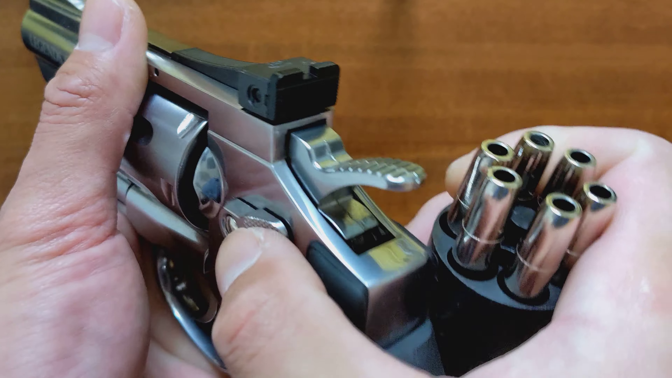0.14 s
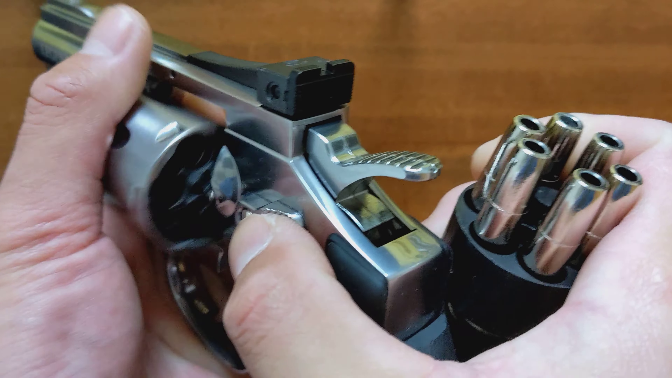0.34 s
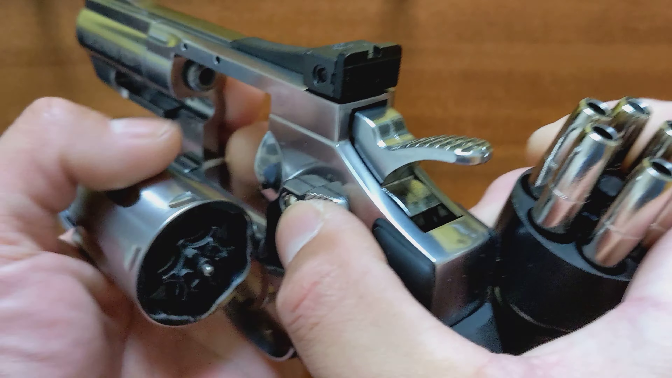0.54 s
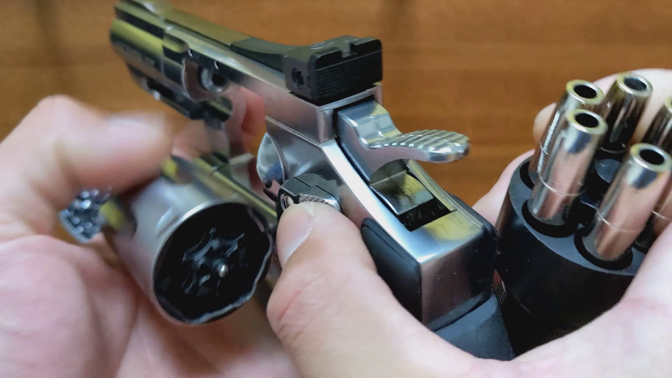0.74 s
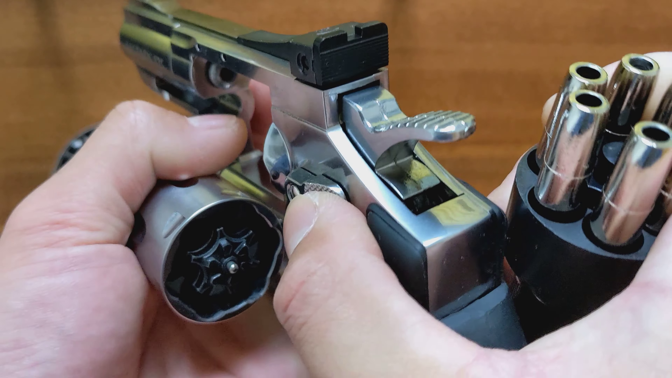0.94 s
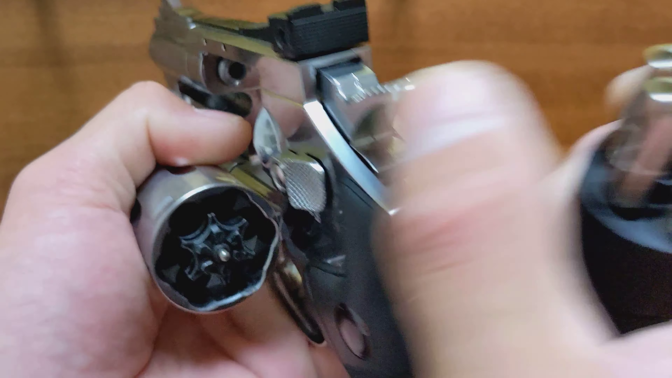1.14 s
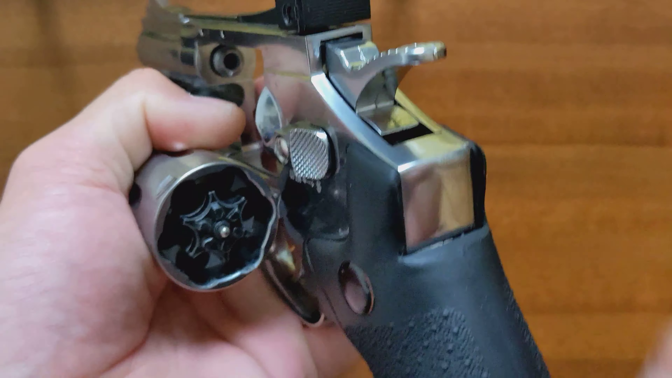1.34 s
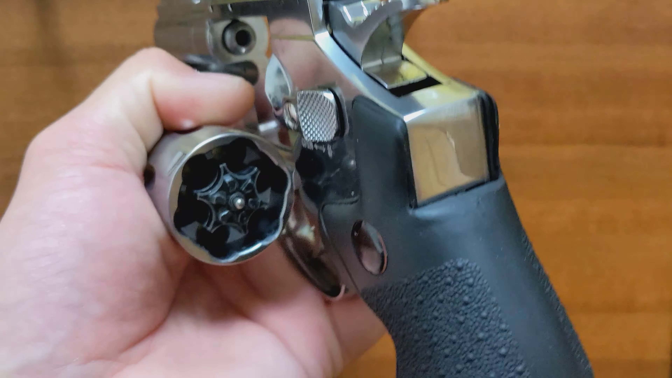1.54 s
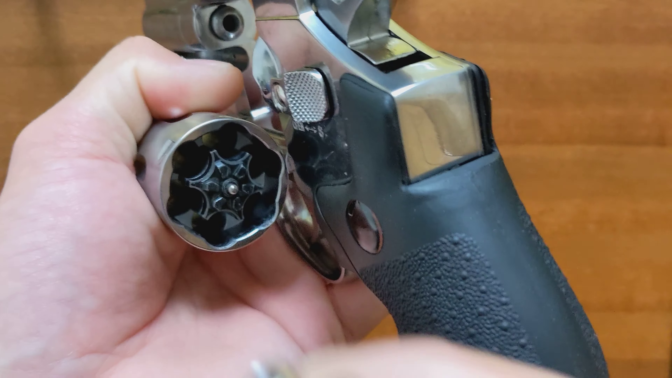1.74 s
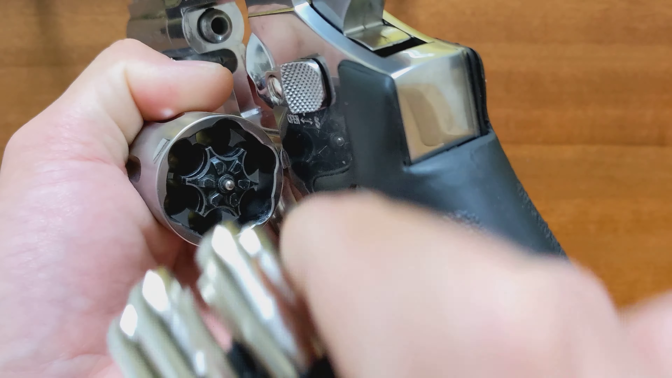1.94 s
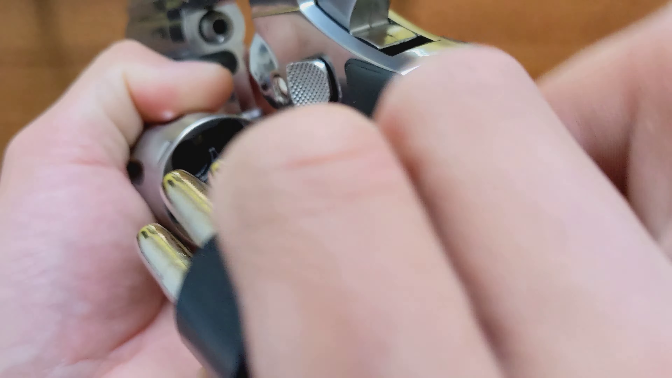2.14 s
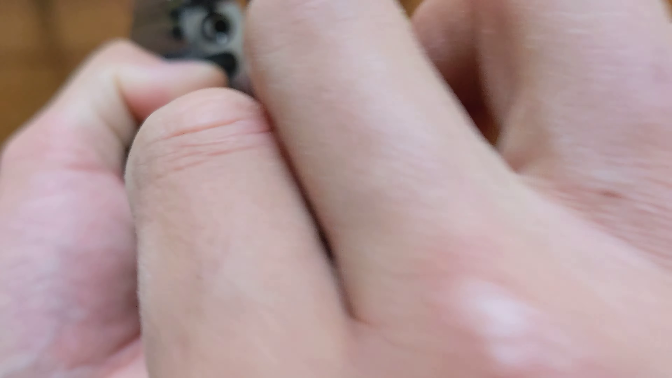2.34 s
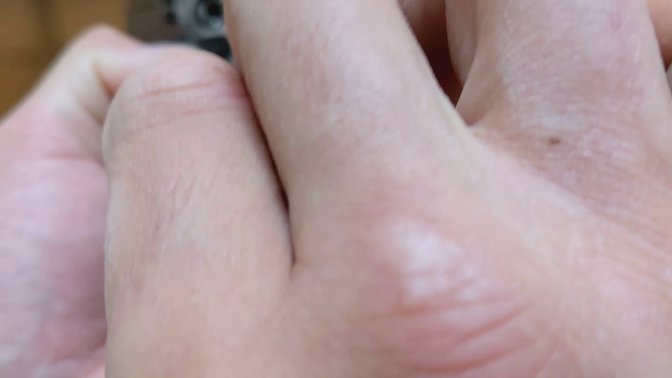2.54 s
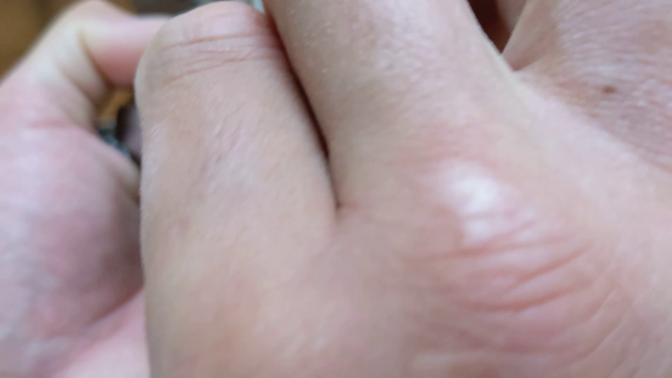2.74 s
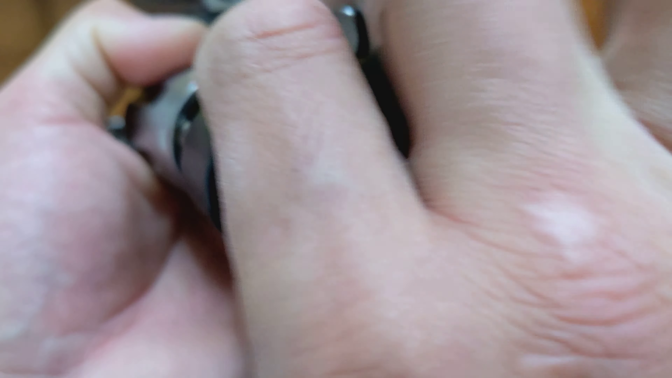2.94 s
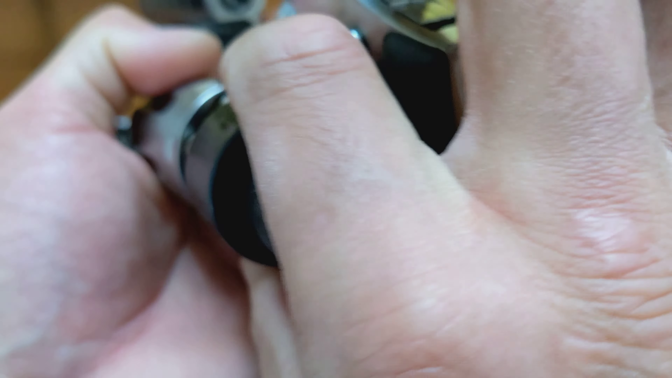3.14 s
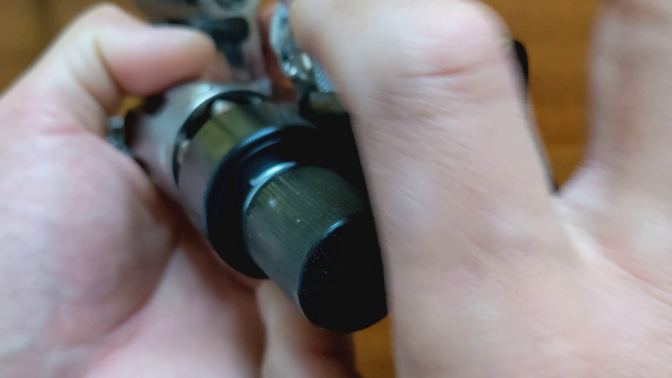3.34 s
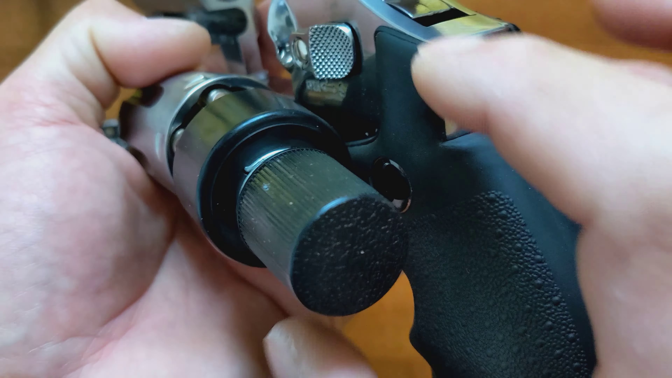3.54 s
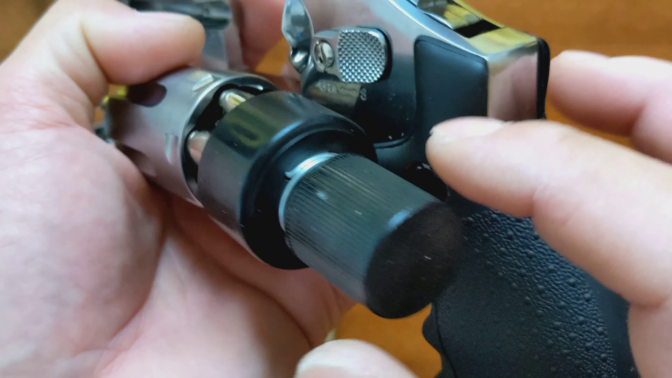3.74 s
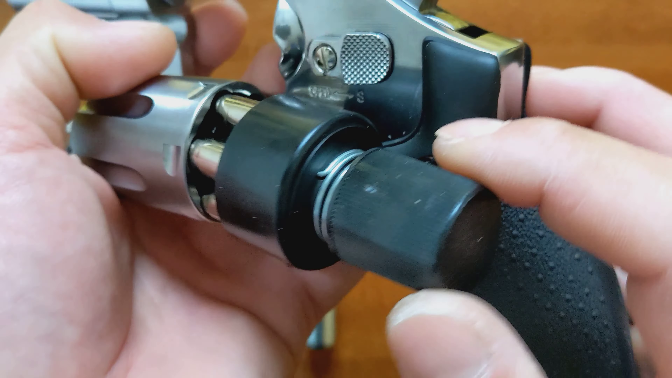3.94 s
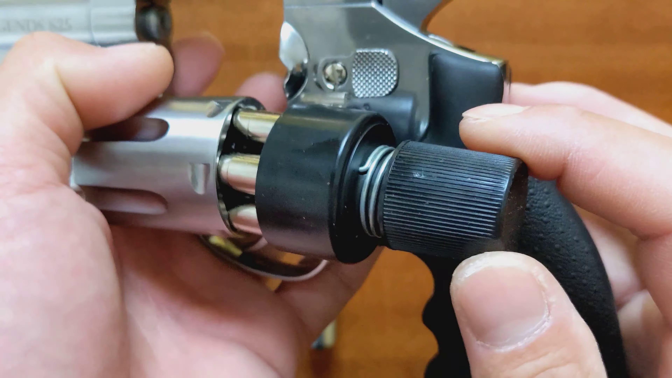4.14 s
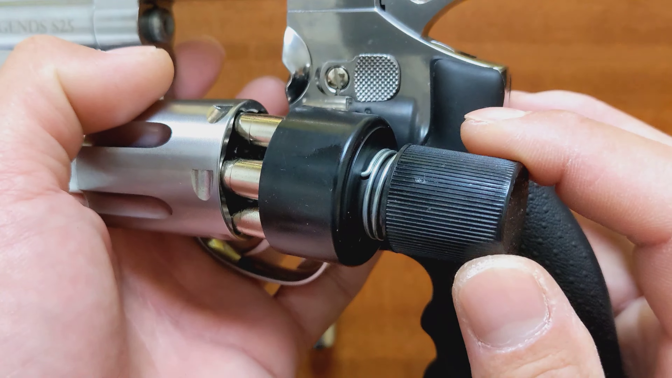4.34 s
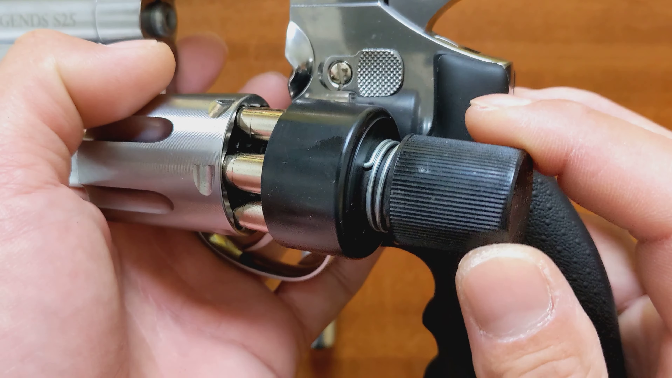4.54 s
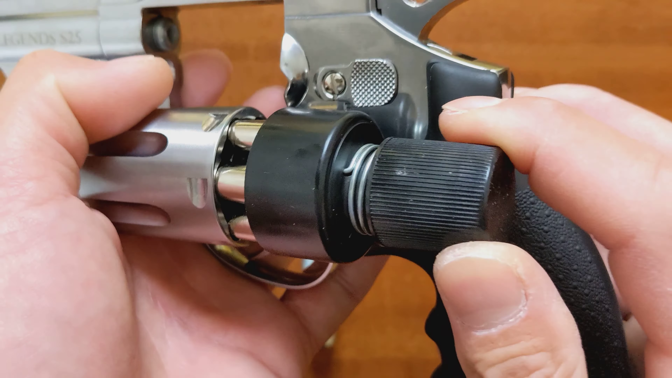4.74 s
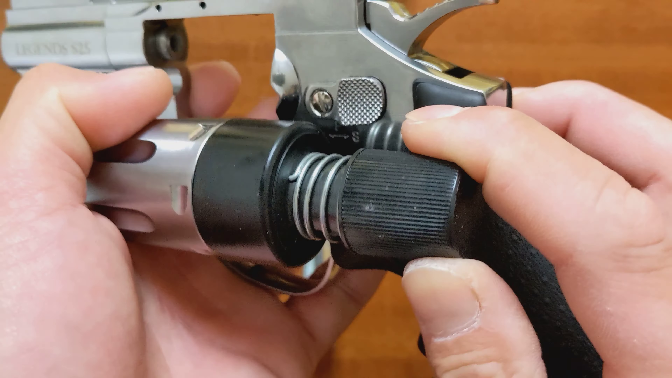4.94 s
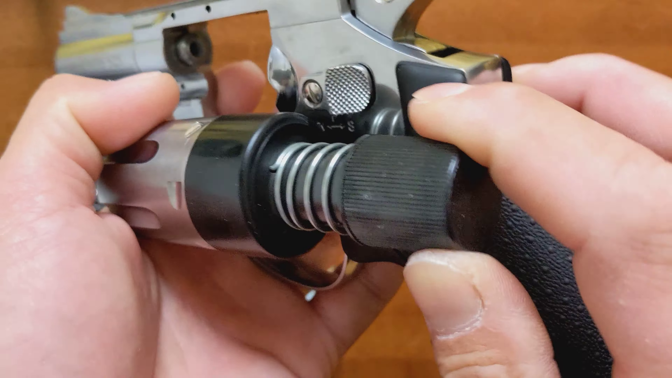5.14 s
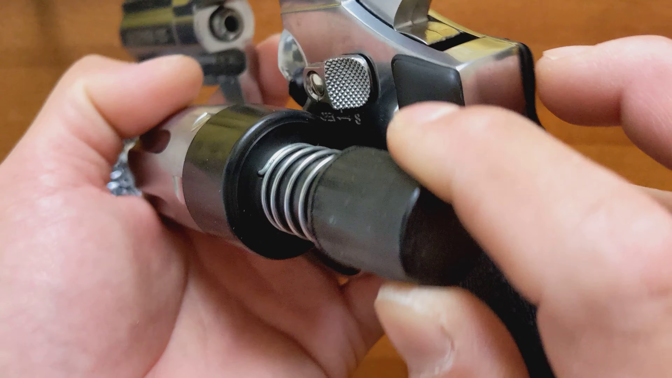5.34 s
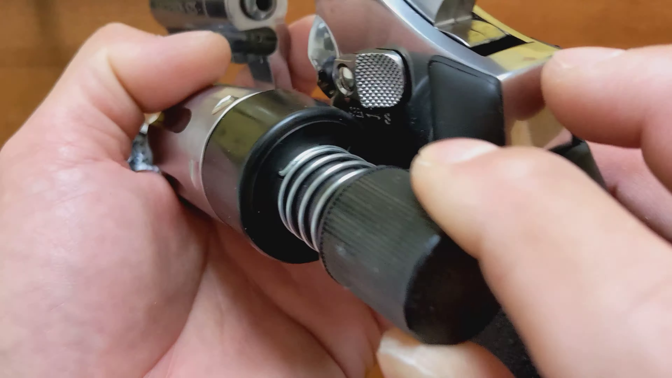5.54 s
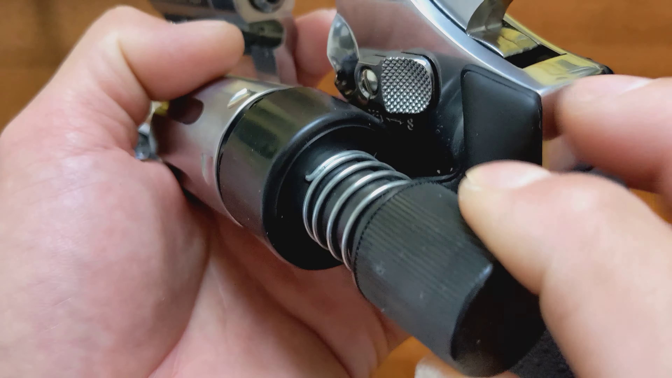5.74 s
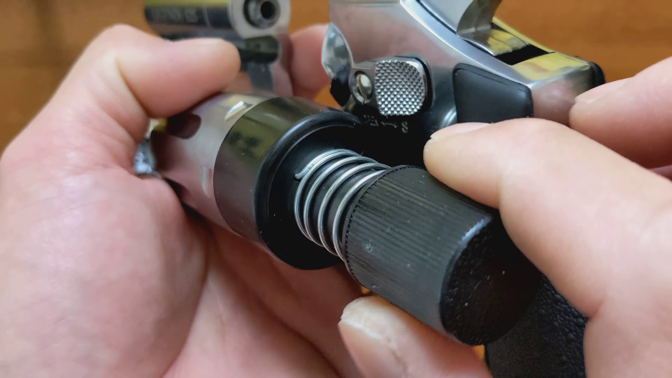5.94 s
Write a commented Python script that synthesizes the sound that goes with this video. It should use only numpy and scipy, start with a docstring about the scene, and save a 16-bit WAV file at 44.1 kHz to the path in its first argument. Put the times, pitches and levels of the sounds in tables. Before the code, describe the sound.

A revolver clicks open, cartridges clink and scrape into the chambers, and a spring loader releases with a sharp double snap.

```python
"""A small room, a wooden table, the microphone close to a revolver being loaded by hand.
The latch is pushed and the cylinder swings out; cartridges rattle in a speedloader, scrape into the
chambers, and the loader's spring snaps them home. Each blow is a burst of rough contact that sounds
hand-damped steel or brass and leaves a few modes ringing. Skin rubs on steel, the near walls answer
briefly, and low ventilation noise and a hum lie underneath."""
import sys
import numpy as np
from scipy import signal
from scipy.fft import rfft, irfft
from scipy.io import wavfile
from scipy.ndimage import uniform_filter1d

SR = 44100
rng = np.random.default_rng(int(sys.argv[2]) if len(sys.argv) > 2 else 0)


def transcribe(u):
    """Save the signal u as a 16-bit wav file named by the first command-line argument.

    u: samples, shape (n,) or (channels, n), limited to [-1, 1]; the rate is SR.
    q: integer samples, one column per channel.
    """
    v = np.clip(np.atleast_2d(u).T, -1, 1)
    q = np.round(v * 32767).astype(np.int16)
    wavfile.write(sys.argv[1], SR, q)


N = 264600
CUTOFF_HZ = 16100
LEAD_S = .006   # the faces graze this long before a blow

# borders between the knock, clack, click and edge of a blow: (frequency [Hz])
REGISTER_BORDERS = [1600, 4000, 9000]
# hand-damped resonances of the cartridges: (frequency [Hz], width [Hz], level [dB])
CARTRIDGE_BODY = [(866, 65, 1), (1043, 58, 3), (1316, 170, -4.5), (1930, 180, -4), (2340, 130, 5),
                  (2690, 350, 1.5), (3070, 400, 2), (5230, 840, -5), (6886, 820, -3), (12300, 1200, -15),
                  (15600, 1300, -13.5)]
# brass dragging over steel: (time [s], length [s], level [dB])
BRASS_SCRAPES = [(0.4, 0.099, -56), (1.559, 0.055, -65), (2.117, 0.082, -63.5), (2.735, 0.087, -50),
                 (2.903, .053, -56.5), (2.965, .12, -52.5), (3.267, 0.019, -66.5), (3.353, 0.02, -64.5),
                 (4.719, 0.03, -66.5), (5.831, 0.081, -51.5)]


def revolver(level_db=-1.26):
    """Close up, a little to the right: the latch is pushed, the cylinder swings out and meets its stop."""
    # hand-damped resonances of the gun: (frequency [Hz], width [Hz], level [dB])
    body = [(851.5, 72, -3), (1043, 68, 0), (1277, 160, -8.5), (1965, 73, -2), (2185, 220, 0),
            (3200, 2200, -4.5), (5500, 1000, 1.5), (7020, 840, 5), (9620, 2600, -1.5), (13500, 2200, 0)]
    # steel ringing on: (frequency [Hz], level [dB], t60 [s])
    modes = [(1055, -20, .14), (2024, -15, .095), (2363, -18, .1), (7052, -6, .085), (12550, 0, .12),
             (14460, -16, .09)]
    # latch, crane and cylinder: (time [s], strength [dB], heft [dB], hardness [dB], slide [ms], ring [dB])
    blows = [(0.303, -48, 4, 1, 1.17, -12.5), (0.3076, -47.5, 4.5, -5, 2.03, -15.5),
             (0.364, -29, -4, 1.5, 0.38, -6), (0.3719, -28.5, -2, 2.5, 0.67, -6),
             (0.389, -40, -6.5, 2.5, 1.02, -22.5), (0.4315, -52.5, 15.5, -2.5, 1.1, -13),
             (0.4549, -36.5, 7, 15.5, .12, -21), (0.5765, -40.5, -1, 0, 0.8, -2.5),
             (0.6788, -34, -5, -9, 0.61, -4), (0.6844, -44, -5, 0, .9, -9),
             (0.8586, -48, 1.5, -12.5, 0.17, -19), (0.9446, -36.5, 6, -3.5, 1.04, -1.5),
             (0.9537, -29, -2, -2, 0.62, 4), (0.9609, -34, -8, -4, 0.89, 1),
             (1.1688, -40, -1, -5.5, 1.23, -15)]
    out, bands = np.zeros((2, N)), registers(low_edge_hz=740)
    for s, db, heft_db, hardness_db, slide_ms, ring_db in blows:
        blow = contact(body, modes, db, heft_db, hardness_db, clack_hz=1980, slide_ms=slide_ms,
                       ring_db=ring_db, pan_db=-3, bands=bands, focus_db=-5.0, edge_db=0, edge_gain=1.61)
        add(out, s - LEAD_S - slide_ms / 1000, blow)
    return from_db(level_db) * out


def cartridges(level_db=-2.0, free_ring_db=-6, held_ring_db=-14, press_damping=0.78, dangling_s=(2.45, 3.1)):
    """Cartridges rattle in the loader, knock at the chamber mouths and settle inside."""
    # brass ringing on: (frequency [Hz], level [dB], t60 [s])
    modes = [(2420, -18.5, .08), (5330, -12.5, 0.083), (12570, -14, .1), (12500, -8, .09),
             (15550, -11.5, .089)]
    # brass on loader and chambers: (time [s], strength [dB], heft [dB], hardness [dB], clack pitch [Hz])
    blows = [(1.2209, -47.5, -13, -18, 2340), (1.4847, -48, -27, -17, 2380), (1.549, -44.5, -18, -11, 2260),
             (1.5762, -38, -18, -9.5, 2570), (1.5882, -46, -5, -4, 2300), (1.6121, -25.5, -24, -20, 2360),
             (1.6156, -45.5, -17, 7, 2410), (2.0767, -53.5, 8, 10, 2230), (2.1162, -43.5, -1.5, -2, 2760),
             (2.4254, -60, 3.5, 2, 3030), (2.5023, -29.5, -9, -5, 2430), (2.7415, -40, -3, -3, 2700),
             (2.754, -44, -5, 3, 2500), (2.7633, -36.5, 8, 3.5, 2010), (2.7697, -31.5, 4.5, -6, 2770),
             (2.9231, -27.5, -6, -6, 2500), (2.9858, -42, -5, -1.5, 2020),
             (3.01, -22.5, -15.5, -15.5, 2900), (3.0331, -35.5, -5.5, 5.5, 2420),
             (3.4428, -33, -9.5, -8.5, 2360), (4.7511, -48, -1.5, -2, 3000), (4.858, -56, 6, -13.5, 2320),
             (5.1879, -28, -23, -12, 3400), (5.2081, -45.5, -10, -2, 2620), (5.2318, -45, -1.5, -2, 2120),
             (5.5758, -38.5, -4.5, 1.5, 3320), (5.5856, -39.5, -6, -2.5, 2265), (5.6231, -48, -2, -3, 2240),
             (5.8788, -29, -12, -11, 2845), (5.8893, -30, -4, 5, 3050), (5.9389, -34.5, -2, 1.5, 2140),
             (5.948, -42, -6, 4.5, 3120), (5.9704, -34, -3.5, -4, 2700)]
    # the loader comes in from the right, over the cylinder: (time [s], left minus right [dB])
    place = [(1.6, -11), (2.1, -3.5), (2.5, -0.5), (3.05, -1), (3.5, -1.5), (6, -4.5)]
    out, bands = np.zeros((2, N)), registers(low_edge_hz=600)
    for s, db, heft_db, hardness_db, clack_hz in blows + catches():
        slide_ms = from_db(-.15 * hardness_db)   # soft touches last longer
        # dangling cartridges ring, the less the more heavily they are pressed
        dangling = dangling_s[0] < s < dangling_s[1]
        ring_db = free_ring_db - press_damping * heft_db if dangling else held_ring_db
        pan_db = np.interp(s, *np.transpose(place))
        blow = contact(CARTRIDGE_BODY, modes, db, heft_db, hardness_db, clack_hz, slide_ms, ring_db,
                       pan_db, bands, focus_db=5.5, edge_db=-3, edge_gain=1.17)
        add(out, s - LEAD_S - slide_ms / 1000, blow)
    return from_db(level_db) * out


def speedloader(level_db=1.0, slide_ms=.75):
    """The loader trips and its spring drives the cartridges in: a dry double snap."""
    # hand-damped resonances of the loader: (frequency [Hz], width [Hz], level [dB])
    body = [(580, 61, -18.5), (860, 86, 4.5), (1040, 160, 0), (1320, 170, -2), (1980, 78, 6.5),
            (2300, 210, 4), (3180, 430, 1.5), (5910, 910, -8), (7240, 910, -2.5), (9500, 7400, -9.5),
            (14200, 1200, 1.5)]
    # the loader ringing on: (frequency [Hz], level [dB], t60 [s])
    modes = [(2010, -20.5, .05), (1950, -18.5, 0.055), (2440, -18, .09), (7100, -5.5, 0.058),
             (14000, -13.5, 0.069), (14900, -6, .06)]
    # release and spring: (time [s], strength [dB], heft [dB], hardness [dB])
    blows = [(4.9417, -27, -12.5, -12.5), (4.9456, -18.5, -6, 1), (4.9643, -39, -7, 7),
             (4.9718, -29.5, -16.5, -9), (5.008, -30.5, -10.5, 2.5), (5.015, -11, -25, -8),
             (5.0284, -23.5, -5, 5)]
    out, bands = np.zeros((2, N)), registers(low_edge_hz=640)
    for s, db, heft_db, hardness_db in blows:
        blow = contact(body, modes, db, heft_db, hardness_db, clack_hz=2130, slide_ms=slide_ms,
                       ring_db=-14, pan_db=-1.7, bands=bands, focus_db=-3.5, edge_db=-1, edge_gain=1.7)
        add(out, s - LEAD_S - slide_ms / 1000, blow)
    return from_db(level_db) * out


def contact(body, modes, strength_db, heft_db, hardness_db, clack_hz, slide_ms, ring_db,
            pan_db, bands, focus_db, edge_db, edge_gain, hand_damping_db=-4.5):
    """A graze, the blow and one rebound sound the damped body and leave its steel or brass ringing."""
    push = from_db(-15.5) * force(slide_ms=4.2)   # the graze
    add(push, LEAD_S, force(slide_ms))
    rebound_s = 0.0054 * rng.uniform(.6, 1.4)
    add(push, LEAD_S + rebound_s, from_db(-18.5) * force(slide_ms))
    damped = damped_body(push, body)
    # the struck part colours the clack with its own pitch
    damped = damped + from_db(focus_db) * resonate(damped, clack_hz, width_hz=380)
    # knock, clack, click and edge, as rms over 5 ms: heft feeds the lowest, hardness the upper two
    levels_db = strength_db + np.array([heft_db, 0, hardness_db, edge_gain * hardness_db + edge_db])
    out = np.zeros((2, 8192))
    for band, db in zip(bands, levels_db):
        add(out, 0, from_db(db) * unit_energy(signal.sosfilt(band, damped)) * np.sqrt(.005 * SR))
    # each mode is driven by its own register; the hand holds down those below the click
    for hz, db, t60 in modes:
        held_db = hand_damping_db * (hz < REGISTER_BORDERS[1])
        drive_db = levels_db[np.searchsorted(REGISTER_BORDERS, hz)] + ring_db + held_db
        add(out, LEAD_S + slide_ms / 1000, from_db(drive_db + db) * ringing(hz, t60))
    return out * rms_one(balance(pan_db))


def force(slide_ms, chatter_db=-16, chatter_s=0.013, grit_db=5.0, apart_hz=2800):
    """Rough faces meet, slide and chatter to rest; left and right differ mainly in the treble."""
    t = np.arange(2048) / SR
    progress = t * 1000 / (1.7 * max(slide_ms, .05))   # 1 at the peak of the pressure
    press = (progress * np.exp(1 - progress)) ** 2
    chatter = from_db(chatter_db) * (1 - np.exp(-progress ** 2)) * np.exp(-t / chatter_s) * np.sqrt(slide_ms)
    grit = from_db(grit_db * np.repeat(rng.standard_normal(len(t) // 16), 16))
    mid, side = (press + chatter) * grit * rng.standard_normal((2, len(t)))
    return unit_energy(mid + cut(side, apart_hz, "high", order=1) * np.array([[1], [-1]]))


def damped_body(push, body, grip_shift=0.0097):
    """Resonances share the energy of a push; the grip shifts them a little."""
    shift = 1 + grip_shift * rng.standard_normal(len(body))
    return sum((-1) ** k * from_db(db) * np.sqrt(width) * unit_energy(resonate(push, hz * shift[k], width))
               for k, (hz, width, db) in enumerate(body))


def ringing(hz, t60, spread_db=3, detune=0.0046):
    """One struck mode dies away; level and pitch vary from blow to blow, phase from side to side."""
    t = np.arange(8192) / SR
    phase = rng.uniform(0, 2 * np.pi) + rng.normal(0, 0.69, (2, 1))
    gain = from_db(spread_db * rng.standard_normal())
    shift = 1 + detune * rng.standard_normal()
    attack = 1 - np.exp(-t / .001)
    return gain * np.sin(2 * np.pi * hz * shift * t + phase) * attack * decay(t, t60)


def tings():
    """A small part of the loader, likely its spring, rings on its own, thin and high."""
    # each ting: (time [s], level [dB])
    strikes = [(3.013, -39), (3.033, -36), (4.02, -71), (4.752, -53)]
    # a cluster of close modes: (frequency [Hz], level [dB], t60 [s])
    modes = [(12800, 0, .07), (12800, -3.5, 0.1), (13190, 3, 0.066)]
    out = np.zeros((2, N))
    for s, db in strikes:
        add(out, s, sum(from_db(db + mode_db) * ringing(hz, t60) for hz, mode_db, t60 in modes))
    return out


def catches(gap_s=.03, above_scrape_db=5, heft_db=0, hardness_db=-2, clack_hz=2500):
    """Dragging brass catches in light ticks, unevenly spaced along each scrape."""
    return [(s + (k + rng.uniform(0.16, 0.62)) * gap_s, db + above_scrape_db,
             heft_db, hardness_db, clack_hz * rng.uniform(.85, 1.15))
            for s, length, db in BRASS_SCRAPES for k in range(int(length / gap_s))]


def friction():
    """Skin on steel gives a fine hiss; dragging brass sounds the cartridges' resonances."""
    # skin sliding on steel: (time [s], length [s], level [dB])
    rubs = [(1.108, .14, -61.5), (1.849, 0.12, -59.5), (1.962, 0.068, -55), (3.453, 0.098, -68.5),
            (5.134, 0.091, -55), (5.462, 0.078, -66), (5.814, 0.1, -56)]
    # spectrum of its hiss: (frequency [Hz], level [dB])
    rub_colour = [(900, -45), (2200, 4), (3300, -4), (5000, -9.5), (7800, -1), (10500, -11.5), (13000, -2),
                  (16000, -4.5)]
    out = np.zeros((2, N))
    for s, length, db in rubs:
        add(out, s, from_db(db) * slide(length, grain_db=2.5, colour=rub_colour))
    for s, length, db in BRASS_SCRAPES:
        brass = damped_body(slide(length, grain_db=4.0), CARTRIDGE_BODY)
        add(out, s, from_db(db) * rms_one(cut(brass, 700, "high")))
    return out


def slide(length_s, grain_db, colour=None):
    """A grainy friction noise that swells and fades."""
    size = 2 * round(length_s * SR / 2)
    roughness = rms_one(uniform_filter1d(rng.standard_normal(16384), size=60))
    hiss = rms_one(from_db(grain_db * roughness) * stereo_noise(len(roughness), colour))
    return np.sqrt(np.hanning(size)) * hiss[:, :size]


def thud(hits, level_db=-19.5, band_hz=(315, 654)):
    """The hands and the grip take up each blow as a faint dull thud."""
    power = uniform_filter1d(np.mean(hits ** 2, axis=0), size=128)
    envelope = np.sqrt(np.maximum(power, 0))
    return from_db(level_db) * cut(envelope * stereo_noise(N), band_hz, "band", order=3)


def room(x, build_s=0.0013, late_db=-33, late_t60_s=.25):
    """Hands, table and near walls return a dense, short tail; the rest of the room a faint longer one."""
    # decay of the short tail: (frequency [Hz], t60 [s])
    short_t60 = [(500, 0.061), (1200, 0.12), (3000, 0.089), (7000, 0.088), (15000, 0.066)]
    # reflected against direct sound: (frequency [Hz], level [dB])
    reflected = [(500, -6.5), (1200, -6), (3000, -7), (7000, -10.5), (15000, -12)]
    t = np.arange(16384) / SR
    edges = np.geomspace(250, 17000, 8)
    build = 1 - np.exp(-(t / build_s) ** 2)
    response = 0
    for low, high in zip(edges, edges[1:]):
        hz = np.sqrt(low * high)
        envelope = build * (decay(t, at_hz(short_t60, hz)) + from_db(late_db) * decay(t, late_t60_s))
        tail = unit_energy(cut(stereo_noise(len(t)), [low, high], "band", order=3) * envelope)
        response = response + from_db(at_hz(reflected, hz)) * np.sqrt((high - low) / (SR / 2)) * tail
    return signal.fftconvolve(x, response, axes=1)[:, :N]


def ventilation(air_gain_db=3.5, rumble_db=-64.5):
    """Room tone: a soft rush of air that drifts in level over a steady rumble."""
    # spectrum of the air: (frequency [Hz], level [dB])
    air_colour = [(150, -35), (230, -9.5), (260, -16.5), (420, -16.5), (660, -9), (850, -6), (1400, -9.5),
                  (1550, -23.5), (2150, -23), (3000, -23), (4200, -27.5), (7100, -29), (10900, -34.5),
                  (15800, -32)]
    # its drift: (time [s], level [dB])
    air_level = [(0.0, -66.5), (0.59, -64), (1.5, -67), (1.97, -65), (3.78, -66), (4.5, -68.5),
                 (5.75, -64.5)]
    # spectrum of the rumble: (frequency [Hz], level [dB])
    rumble_colour = [(25, -23.5), (42, -11.5), (58, -1.5), (75, -3), (100, 6.5), (125, 0.5), (160, 1),
                     (215, -1.5), (250, -35), (320, -21.5)]
    air = from_db(in_time(air_level) + air_gain_db) * stereo_noise(N, air_colour)
    rumble = from_db(rumble_db) * cut(stereo_noise(N, rumble_colour), 360, "low")
    return air + rumble


def hum(hum_hz=59.6, gain_db=-0.5, waver=0.19):
    """Far back, a low hum swells and dies down among a few wavering tones."""
    # course of the hum: (time [s], level [dB])
    hum_level = [(0.0, -68), (0.03, -63.5), (1.62, -63), (1.97, -70.5), (2.16, -55), (2.61, -71),
                 (2.86, -62), (3.61, -77.5), (6.0, -77.5)]
    # faint tones that swell and fade: (frequency [Hz], level [dB], peak time [s], spread [s])
    tones = [(213, -64, .95, 0.14), (218, -69, 1.9, 0.35), (217, -69, 4.45, .2), (174, -69.5, 3.0, 1.4),
             (149, -69, 4.0, 0.73), (489, -75.5, 1.1, 1.1)]
    t = np.arange(N) / SR
    out = from_db(in_time(hum_level) + gain_db) * np.sqrt(2) * np.sin(2 * np.pi * hum_hz * t)
    for hz, db, peak_s, spread_s in tones:
        level_sway, phase_sway = waver * signal.resample(rng.standard_normal((2, 60)), N, axis=1)
        swell = np.exp(-((t - peak_s) / spread_s) ** 2 / 2) * (1 + level_sway)
        out = out + from_db(db) * swell * np.sqrt(2) * np.sin(2 * np.pi * hz * t + 2 * phase_sway)
    return out


def stereo_noise(size, colour=None):
    """Noise at rms 1, alike on both sides in the bass and unrelated in the treble."""
    # likeness of left and right at the microphone: (frequency [Hz], correlation [0-1])
    likeness = [(60, 0.95), (150, 0.98), (300, 0.84), (900, 0.083), (2200, 0), (4000, 0), (16000, 0.073)]
    hz = np.arange(size // 2 + 1) * SR / size
    alike = np.clip(at_hz(likeness, hz), 0, 1)
    mid, side = rfft(rng.standard_normal((2, size)))
    both = np.sqrt(1 + alike) * mid + np.sqrt(1 - alike) * side * np.array([[1], [-1]])
    gain = 1 if colour is None else from_db(at_hz(colour, hz))
    return rms_one(irfft(both * gain, size))


def registers(low_edge_hz):
    """Band-passes for the knock, the clack, the click and the edge of a blow."""
    edges = [low_edge_hz, *REGISTER_BORDERS, CUTOFF_HZ + 1500]
    return [signal.butter(4, band, "band", fs=SR, output="sos") for band in zip(edges, edges[1:])]


def resonate(x, hz, width_hz):
    """One damped resonance, with a gain of 1 at its peak."""
    r = np.exp(-np.pi * width_hz / SR)
    gain = (1 - r * r) / 2
    return signal.lfilter([gain, 0, -gain], [1, -2 * r * np.cos(2 * np.pi * hz / SR), r * r], x)


def cut(x, hz, kind, order=2):
    return signal.sosfilt(signal.butter(order, hz, kind, fs=SR, output="sos"), x)


def add(out, s, sound):
    """Mix a stereo sound in at s seconds."""
    start = max(round(s * SR), 0)
    out[:, start:start + sound.shape[1]] += sound[:, :out.shape[1] - start]


def in_time(rows):
    return np.interp(np.arange(N) / SR, *np.transpose(rows))


def at_hz(points, hz):
    f, value = np.transpose(points)
    return np.interp(np.log(np.maximum(hz, 1)), np.log(f), value)


def decay(t, t60):
    return np.exp(-np.log(1000) * t / t60)


def balance(left_minus_right_db):
    return from_db(left_minus_right_db * np.array([[.5], [-.5]]))


def from_db(db):
    return 10 ** (np.asarray(db) / 20)


def rms_one(x):
    return x / np.sqrt(np.mean(x ** 2) + 1e-20)


def unit_energy(x):
    return x / np.sqrt(np.sum(x ** 2, axis=-1, keepdims=True) + 1e-20)


def scene():
    """Gun, cartridges and loader close to the microphone, the small room behind them."""
    room_tone = (ventilation() + hum()) * balance(-1.5)
    loading = speedloader() + cartridges()
    near = revolver() + loading + tings() + thud(loading) + friction()
    return near + room(near) + room_tone


def record(dry):
    """The recorder rounds the highest peaks and cuts the top of the treble."""
    rounded = 1.1 * np.tanh(dry / 1.1)
    return signal.sosfilt(signal.ellip(10, .2, 70, CUTOFF_HZ, fs=SR, output="sos"), rounded)


dry = scene()
out = record(dry)
transcribe(out)
```